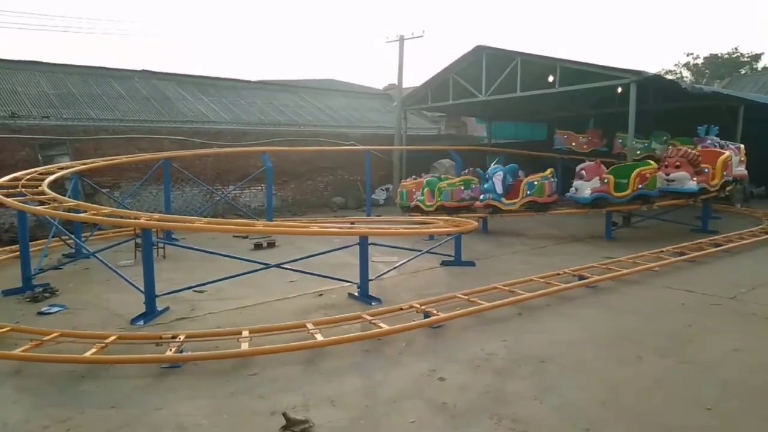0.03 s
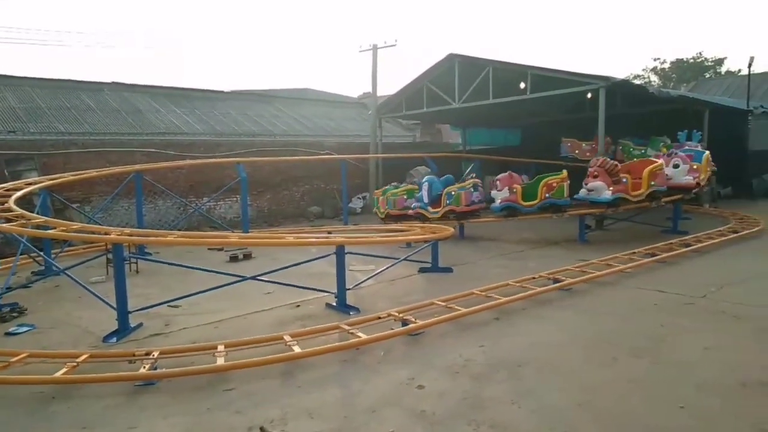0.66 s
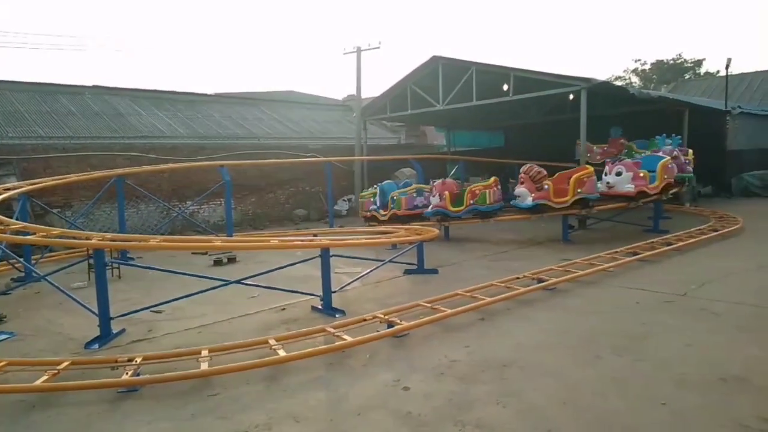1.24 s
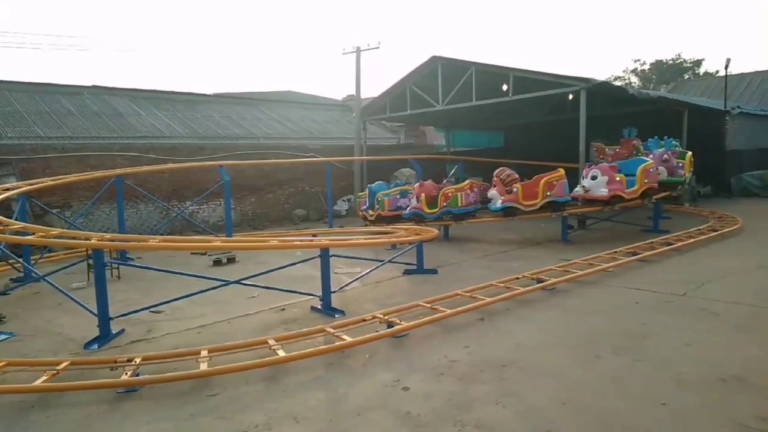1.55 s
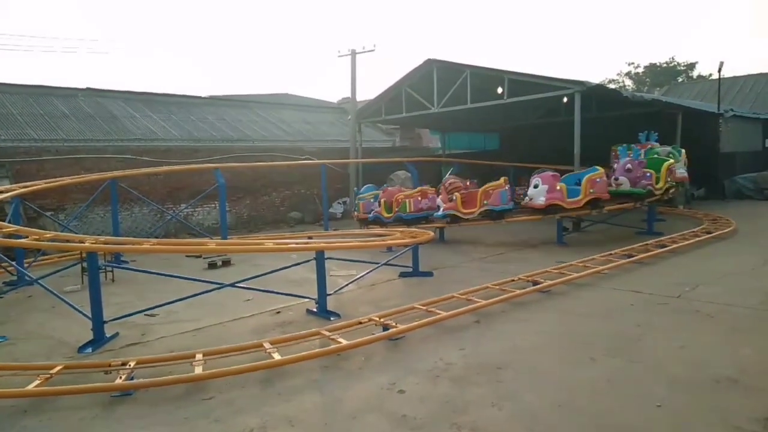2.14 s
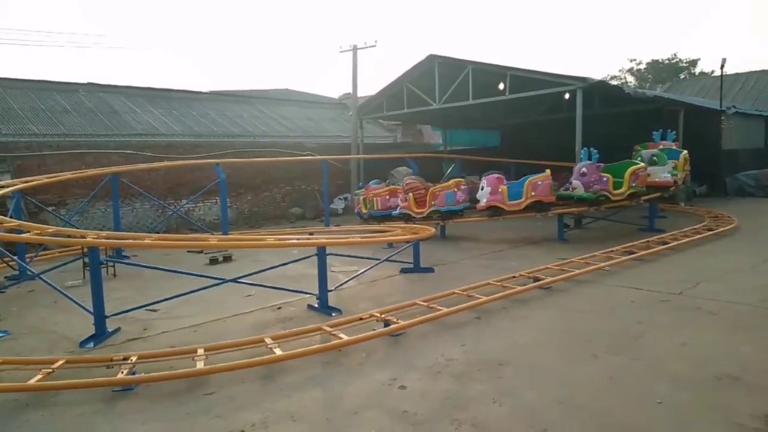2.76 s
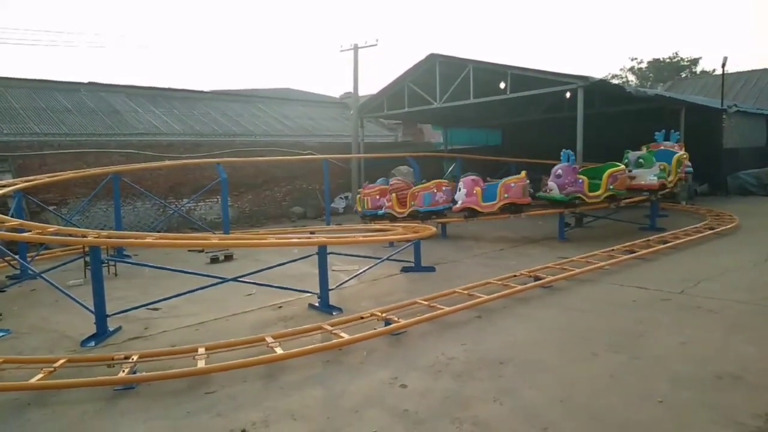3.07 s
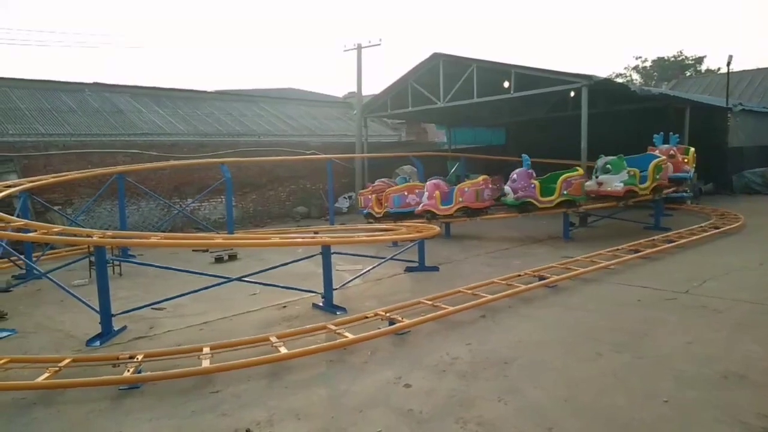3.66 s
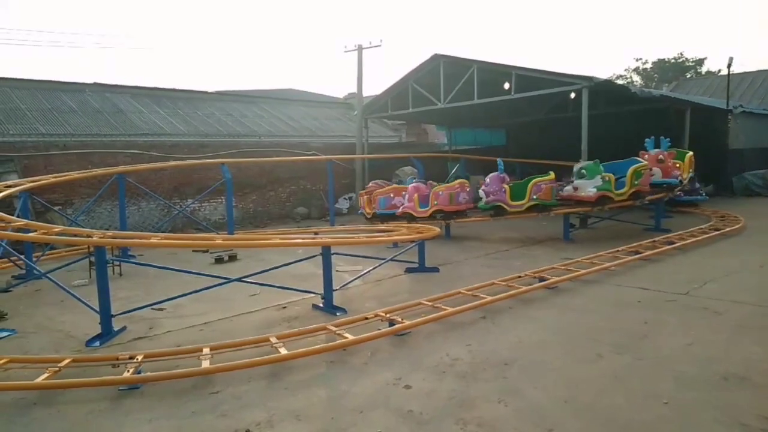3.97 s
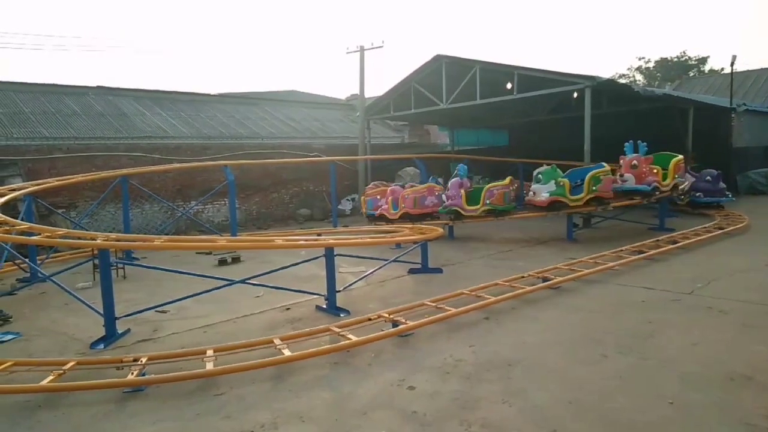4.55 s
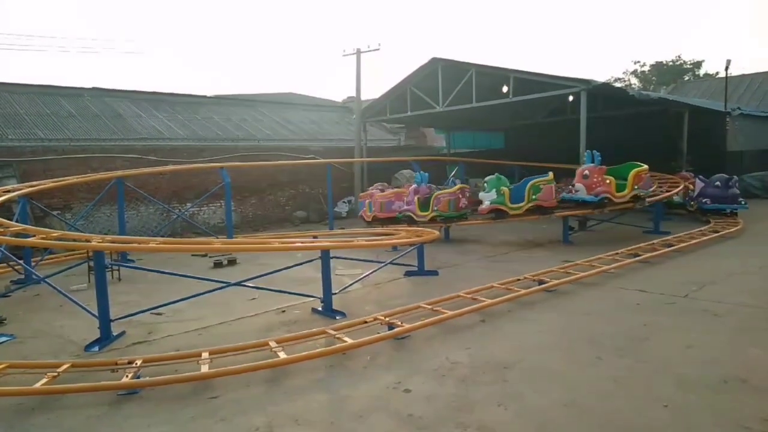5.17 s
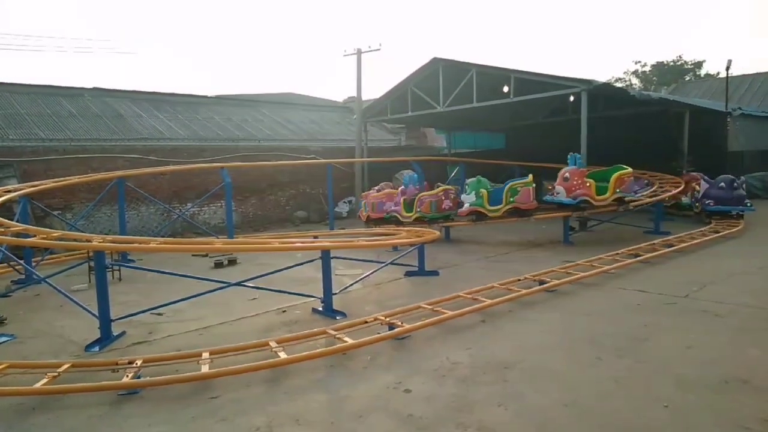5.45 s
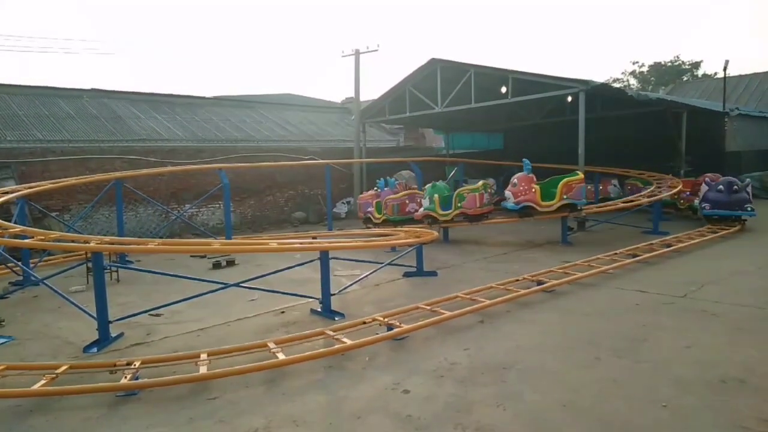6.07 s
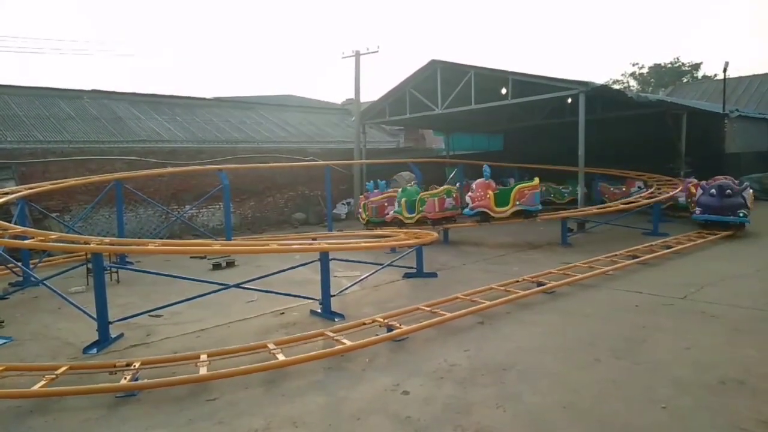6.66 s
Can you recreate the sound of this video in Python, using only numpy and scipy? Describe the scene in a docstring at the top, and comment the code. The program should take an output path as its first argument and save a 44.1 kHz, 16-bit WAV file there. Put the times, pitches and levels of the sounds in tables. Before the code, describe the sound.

A small fairground coaster rolls round a tubular steel track in an open yard. A steady low rumble from the rails and posts runs under the hollow roar of the cars and the rush of the wheels. Soft irregular thuds and bumps come throughout, with light bracket chatter and a few faint scrapes. Heard from one spot beside the track, the train grows slightly quieter and duller as it draws away.

```python
"""Small fairground coaster, drawing away.

A train rolls round a tubular steel track in an open yard. Uneven wheels shake rails and posts into a
low rumble, hollow cars and rail tubes into a roar; the treads rush. The frame thuds as cars load its
posts; brackets chatter, flanges scrape, bumps swell at the rail joints. A wall echoes the train."""
import sys
import numpy as np
from scipy import signal
from scipy.fft import rfft, irfft
from scipy.io import wavfile
from scipy.ndimage import uniform_filter1d, map_coordinates

SR = 44100
rng = np.random.default_rng(int(sys.argv[2]) if len(sys.argv) > 2 else 0)


def master_out(mix):
    """Clip the mix to full scale and print it as 16-bit PCM to the path in sys.argv[1]."""
    frames = np.transpose(np.atleast_2d(mix))
    ceiling = np.clip(frames, -1, 1)
    pcm = np.round(ceiling * 32767).astype(np.int16)
    wavfile.write(sys.argv[1], SR, pcm)


N = 304731
T = np.arange(N) / SR
FREQS_HZ = np.maximum(np.arange(N // 2 + 1) * SR / N, 1)

# rail and post bending modes: f/Hz, width/Hz, level/dB
FRAME_RESONANCES = [(35.3, 5.1, -17), (51, 11, -11.5), (69.7, 12.5, -11), (99.2, 20.2, -1.5),
                    (125, 17.8, -2.5), (138.2, 23.2, -3)]
# slow rumble envelope: t/s, level/dB
RUMBLE_ENVELOPE = [(0.0, -33), (2.6, -33.5), (3.4, -33.5), (4.2, -34.5), (4.6, -32.5), (5.6, -35.7),
                   (6.9, -34)]
# cars loading posts: t/s, sigma/s, f/Hz, glide/(Hz/s), level/dB
POST_THUDS = [(0.222, 0.022, 120.5, 200, -32), (0.314, 0.022, 121, -250, -31),
              (0.62, 0.023, 125.7, 100, -31.5), (0.863, 0.038, 97.2, 0, -31.5),
              (1.077, 0.017, 127.3, -100, -30), (1.242, 0.037, 114.7, -350, -33),
              (1.495, 0.034, 136, -250, -31), (1.59, 0.036, 112, -400, -30.5), (1.988, 0.03, 103, 0, -34),
              (2.053, 0.019, 127.8, 102, -28.5), (2.173, 0.032, 99.6, 0, -30.5),
              (2.364, 0.031, 128.5, -200, -28), (2.406, 0.053, 96.5, 2, -31.5),
              (2.607, 0.026, 131, -100, -31.5), (2.77, 0.03, 128, -200, -31), (2.89, 0.045, 77.2, 2, -35.5),
              (3.3, 0.017, 129, 0, -33), (3.494, 0.054, 99, 64, -33), (3.868, 0.03, 123.2, 400, -31),
              (4.502, 0.022, 81, -450, -34.5), (4.571, 0.027, 141.8, 300, -31.5),
              (4.922, 0.036, 130.9, 148, -31.5), (5.09, 0.025, 122.4, 0, -33),
              (6.49, 0.024, 95.5, 0, -32.5), (6.743, 0.033, 134.3, 250, -26), (6.79, 0.03, 102, 1, -31.5)]
# tie and brace modes: f/Hz, width/Hz, level/dB
BRACE_RESONANCES = [(161.3, 27, -0.5), (185.7, 34.7, 0.5), (211, 21.4, -2.5)]
# rail tube modes: f/Hz, width/Hz, level/dB
TUBE_RESONANCES = [(531, 67, -2.5), (600, 54, -1), (688.5, 46.5, 0.5), (748, 47, -3)]
# car panel modes: f/Hz, width/Hz, level/dB
CAR_RESONANCES = [(266, 58, -1), (323.3, 20, 0), (365.4, 50.6, 1.5), (480.4, 70, 0)]
# tread rush spectrum: f/Hz, level/dB
TREAD_SPECTRUM = [(250, -9.5), (600, 2.5), (1000, 0.5), (1600, -5.5), (1760, -2.5), (2100, -5.5),
                  (2600, -13.5), (3000, -14.5), (3400, -20.5), (4000, -25), (4600, -34), (5400, -42.5),
                  (7000, -46.5), (10000, -57)]
# wheel and bracket modes: f/Hz, width/Hz, level/dB
WHEEL_RESONANCES = [(907, 174, -1), (1164, 193, 0), (1377, 142, 0.5), (1570, 152, 1), (1983, 250, -0.5),
                    (2220, 246, -4), (2508, 150, -7.5), (2760, 160, -13), (3285, 320, -16)]
# background hiss spectrum: f/Hz, level/dB
HISS_SPECTRUM = [(3000, 4), (5400, -9), (5800, 5.5), (6300, -11.5), (7200, -2), (8500, -5), (10500, 0.5),
                 (12000, 3.5)]
# rail joint crossings: t/s, sigma/s, brace/dB, car/dB, tube/dB, wheel/dB
JOINT_BUMPS = [(0.28, 0.04, -46, -43, -43, -45), (0.59, 0.027, -44, -47, -42, -43),
               (0.84, 0.05, -42, -50, -52, -44), (1.115, 0.026, -42, -52, -52, -57),
               (1.338, 0.046, -38.5, -38.5, -38.5, -43), (1.64, 0.036, -48, -45, -47, -40.5),
               (1.78, 0.05, -50, -44, -55, -59), (1.995, 0.047, -52, -38.5, -43, -51),
               (2.304, 0.057, -38.5, -55, -56, -48), (2.62, 0.075, -34, -41, -44, -44),
               (3.595, 0.097, -40, -44, -41.5, -47), (3.846, 0.056, -58, -46, -43.5, -51),
               (4.148, 0.06, -48, -52, -43, -48), (4.83, 0.081, -46, -55, -43, -49),
               (5.093, 0.034, -53, -50, -43, -45), (5.877, 0.04, -37, -43, -43, -48),
               (6.76, 0.038, -46, -42, -40, -60)]
# flange touches: t/s, sigma/s, level/dB
FLANGE_SCRAPES = [(0.312, 0.02, -59), (0.43, 0.014, -63), (1.318, 0.02, -59), (1.52, 0.04, -60),
                  (2.59, 0.021, -64), (4.5, 0.016, -61)]
# flange scrape spectrum: f/Hz, level/dB
FLANGE_SPECTRUM = [(1500, -25), (2900, -3), (3800, -3), (4600, -12), (5400, -25), (8000, -54)]


def undb(db):
    """Decibels to gain."""
    return 10 ** (np.asarray(db) / 20)


def unit(x):
    """Scale to rms 1."""
    return x / np.sqrt(np.mean(x ** 2))


def colour(x, spectrum):
    """Filter by (f/Hz, level/dB) points; rms 1."""
    hz, db = np.transpose(spectrum)
    response = undb(np.interp(np.log(FREQS_HZ), np.log(hz), db))
    return unit(irfft(rfft(x) * response, N))


def walk(per_s):
    """Smooth random wander, rms 1."""
    hold = int(SR / per_s)
    steps = np.repeat(rng.standard_normal(N // hold + 1), hold)[:N]
    return unit(uniform_filter1d(steps, hold))


def burst(peak_s, sigma_s):
    """Gaussian swell, peak 1."""
    return np.exp(-.5 * np.minimum(((T - peak_s) / sigma_s) ** 2, 100))


def contact(per_s, spread_db):
    """Wheel force on rough rail: tiny random blows of uneven size."""
    hits = rng.random(N) < per_s / SR
    return unit(hits * rng.standard_normal(N) * undb(spread_db * rng.standard_normal(N)))


def ring(modes, per_s, spread_db):
    """Damped, steep-sided resonances, each driven by its own contacts."""
    spectrum = 0
    for hz, width_hz, db in modes:
        detuning = (FREQS_HZ / hz - hz / FREQS_HZ) * hz / (2 * width_hz)
        response = 1 / (1 + 1j * detuning) ** 2
        spectrum = spectrum + undb(db) * response * rfft(contact(per_s, spread_db))
    return unit(irfft(spectrum, N))


def steady(x, span_s):
    """Level out swells slower than span_s, as under constant load."""
    return x / np.sqrt(uniform_filter1d(x ** 2, int(span_s * SR)))


def waver(x, share, per_s):
    """Shifting load: all frequencies wander by a small share."""
    drift_samples = np.cumsum(share * walk(per_s))
    return map_coordinates(x, [np.arange(N) + drift_samples], order=3, mode="mirror")


def frame(gain, thud_waver=0.09, duck_db=-2.5):
    """Rails and posts rumble; as a car loads a post, the rumble yields to a thud of unsteady pitch."""
    shake = ring(FRAME_RESONANCES, per_s=1500, spread_db=3.5)
    rumble = steady(shake, span_s=0.13) * gain
    unsteady_s = T + np.cumsum(thud_waver * walk(per_s=90)) / SR
    for peak_s, sigma_s, hz, glide_hz_per_s, db in POST_THUDS:
        swell = burst(peak_s, sigma_s)
        cycles = hz * unsteady_s + .5 * glide_hz_per_s * (T - peak_s) ** 2 + rng.random()
        swing = np.sqrt(2) * np.sin(2 * np.pi * cycles)
        rumble = rumble * undb(duck_db * swell) + undb(db) * swell * swing
    return rumble


def braces(gain):
    """Lighter ties and braces drone above the rumble."""
    drone = ring(BRACE_RESONANCES, per_s=1500, spread_db=2)
    return steady(drone, span_s=0.28) * gain


def tubes(gain):
    """Steel rail tubes ring hollow under the wheels; pitch shifts from span to span."""
    hollow = ring(TUBE_RESONANCES, per_s=2500, spread_db=2)
    hollow = waver(hollow, share=.016, per_s=6)
    return steady(hollow, span_s=0.25) * gain


def wheels(gain):
    """Grit under the treads makes a broad rush and rings the wheels."""
    rush = colour(contact(per_s=14000, spread_db=2.5), TREAD_SPECTRUM)
    ringing = ring(WHEEL_RESONANCES, per_s=4000, spread_db=2)
    soft_tread_lowpass = signal.butter(N=4, Wn=3500, fs=SR, output="sos")
    ringing = signal.sosfilt(soft_tread_lowpass, ringing)
    roughness_db = 0.57 * walk(per_s=12)
    return (undb(roughness_db - 2) * rush + undb(-3) * ringing) * gain


def brackets(gain, width_hz=40.4, relative_db=-9):
    """Loose brackets chatter: sparse knocks, each with a brief metallic ring."""
    modes = [(hz, width_hz, db) for hz, _, db in WHEEL_RESONANCES]
    knocks = ring(modes, per_s=80, spread_db=1)
    knocks = waver(knocks, share=.012, per_s=9)
    return undb(relative_db) * steady(knocks, span_s=0.17) * gain


def cars(gain):
    """Hollow bodies roar, jolted by their wheels; flexing panels shift the pitch."""
    roar = ring(CAR_RESONANCES, per_s=2500, spread_db=2.5)
    roar = waver(roar, share=.018, per_s=7)
    return steady(roar, span_s=0.22) * gain


def hiss():
    """Faint steady background noise."""
    return undb(-71) * colour(rng.standard_normal(N), HISS_SPECTRUM)


def wall_echo(x, start_delay_s, end_delay_s, db):
    """Add the yard wall's echo; its path lengthens as the train moves on."""
    delay_s = np.linspace(start_delay_s, end_delay_s, N)
    return x + undb(db) * np.interp(T - delay_s, T, x)


def joint_bumps():
    """Force bursts as wheels cross joints. Gain rows: braces, cars, tubes, wheels."""
    return sum(undb(levels_db)[:, None] * burst(peak_s, sigma_s)
               for peak_s, sigma_s, *levels_db in JOINT_BUMPS)


def flanges():
    """Flanges touch the rail side: brief, thin metallic hiss."""
    touch = sum(undb(db) * burst(peak_s, sigma_s) for peak_s, sigma_s, db in FLANGE_SCRAPES)
    return touch * colour(contact(per_s=3300, spread_db=4), FLANGE_SPECTRUM)


def fade(start_db, db_per_s):
    """Gain of a part drawing steadily away."""
    return undb(start_db - db_per_s * T)


def screening(x, corner_hz, start_db, end_db):
    """Treble shelf falls as the cars turn away and screen their wheels."""
    low = signal.sosfiltfilt(signal.butter(N=2, Wn=corner_hz, fs=SR, output="sos"), x)
    return low + (x - low) * undb(np.linspace(start_db, end_db, N))


def post_throb(period_s, crest_s, depth_db):
    """Periodic gain as cars pass over the posts."""
    return undb(depth_db * np.cos(2 * np.pi * (T - crest_s) / period_s))


def scene():
    """Rolling and joint bumps drive track and train, over faint hiss; mono."""
    throb = post_throb(period_s=0.47, crest_s=0.19, depth_db=1)
    frame_gain = undb(np.interp(T, *np.transpose(RUMBLE_ENVELOPE))) * throb
    rolling = [fade(start_db=-38.5, db_per_s=0.6) * throb,
               fade(start_db=-39, db_per_s=0.83),
               fade(start_db=-40.5, db_per_s=0.5),
               fade(start_db=-38, db_per_s=0.52)]
    brace_gain, car_gain, tube_gain, wheel_gain = np.hypot(rolling, joint_bumps())  # powers add
    track = frame(frame_gain) + braces(brace_gain) + tubes(tube_gain)
    gear = wheels(wheel_gain) + brackets(wheel_gain) + flanges()
    train = cars(car_gain) + screening(gear, corner_hz=2800, start_db=1.75, end_db=0.3)
    train = wall_echo(train, start_delay_s=.009, end_delay_s=.016, db=-17)
    return (track + train + hiss())[None]


def record(dry, cutoff_hz=12000):
    """Steep elliptic low-pass."""
    return signal.sosfilt(signal.ellip(N=10, rp=.2, rs=80, Wn=cutoff_hz, fs=SR, output="sos"), dry)


dry = scene()
out = record(dry)
master_out(out)
```